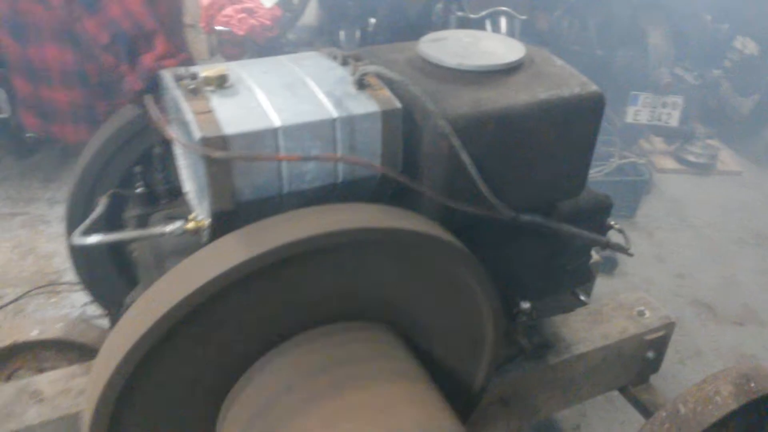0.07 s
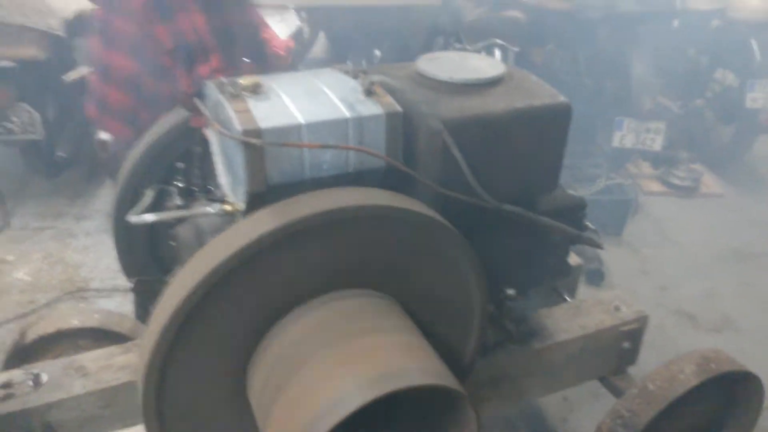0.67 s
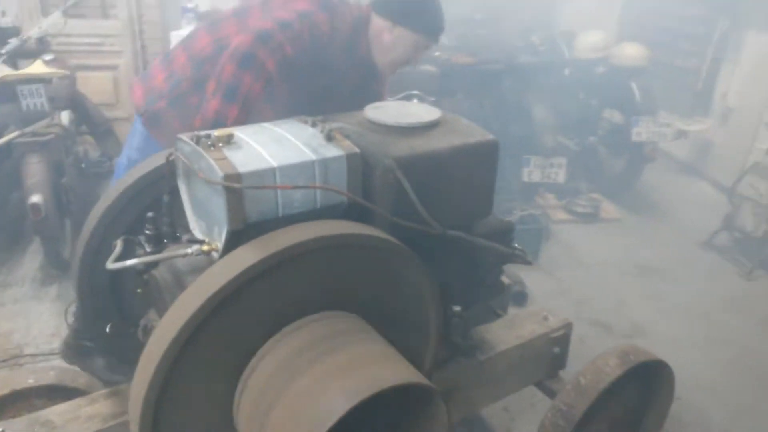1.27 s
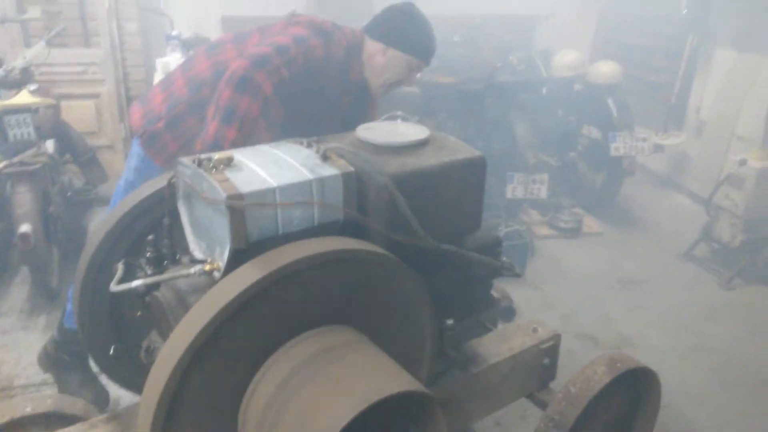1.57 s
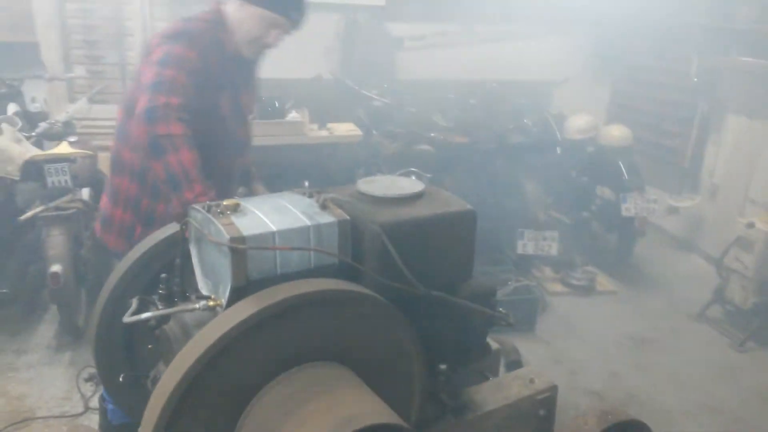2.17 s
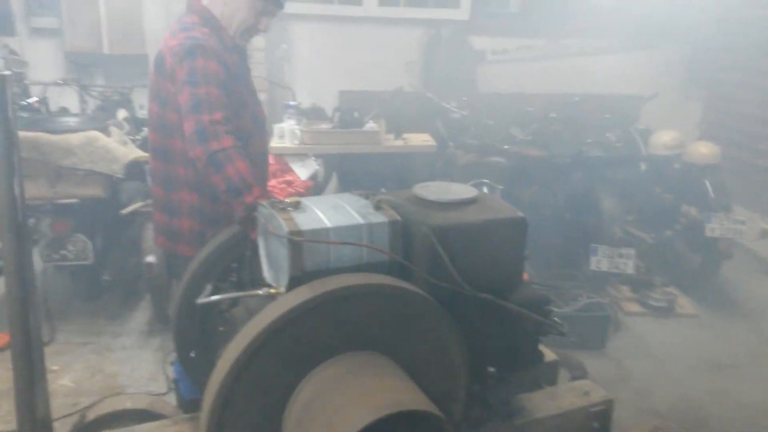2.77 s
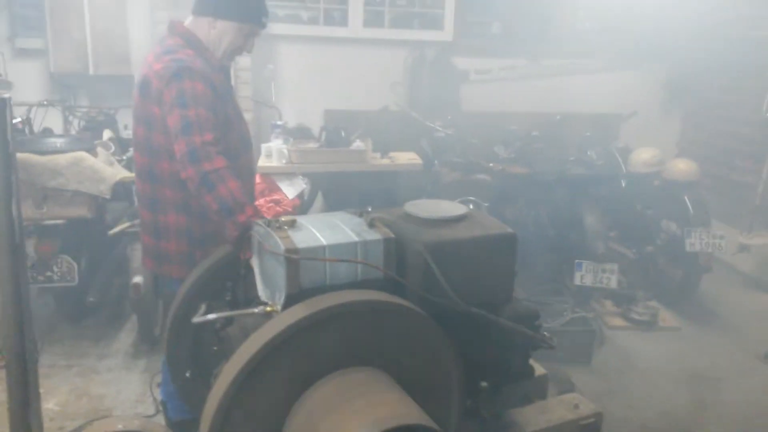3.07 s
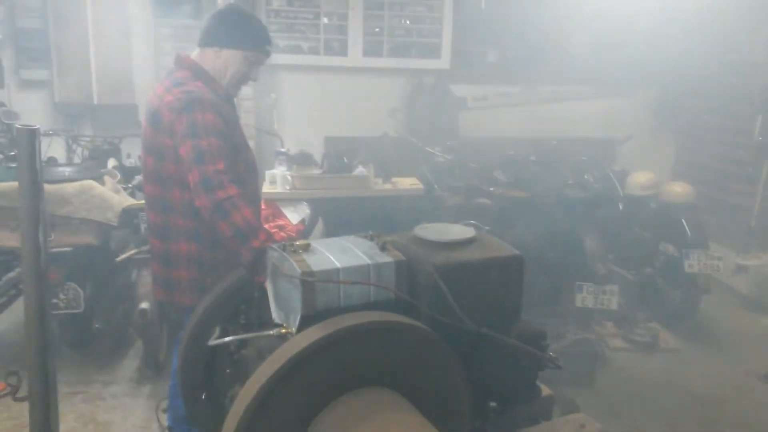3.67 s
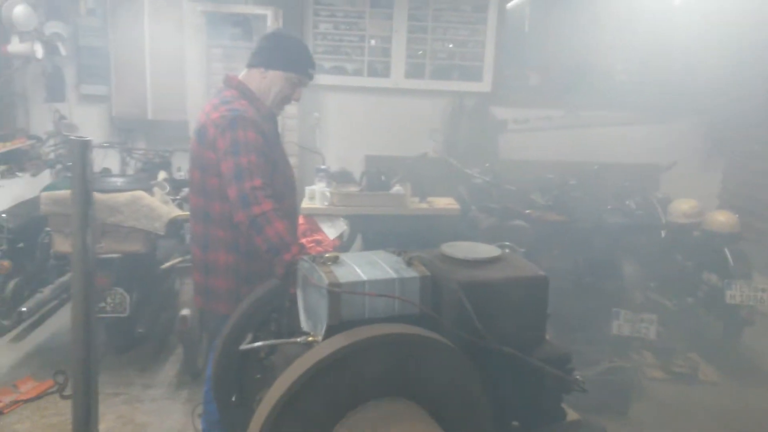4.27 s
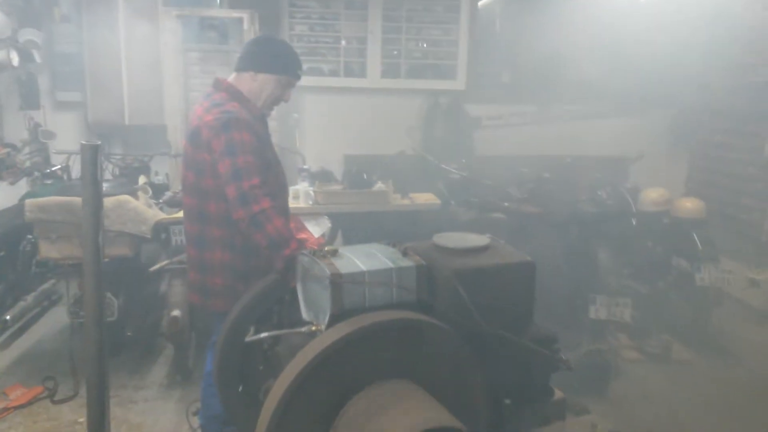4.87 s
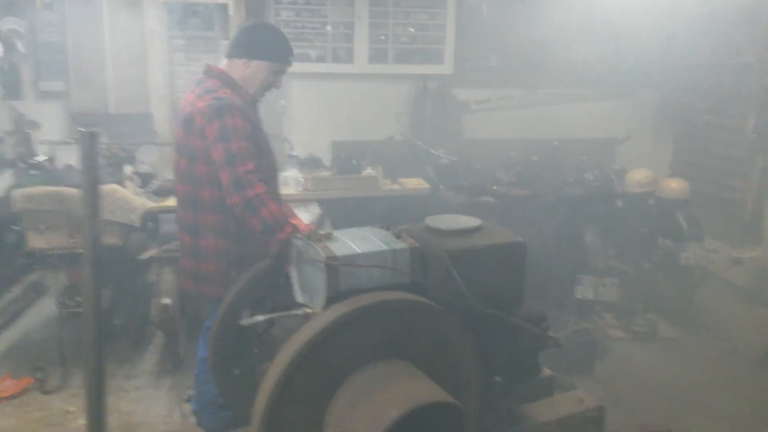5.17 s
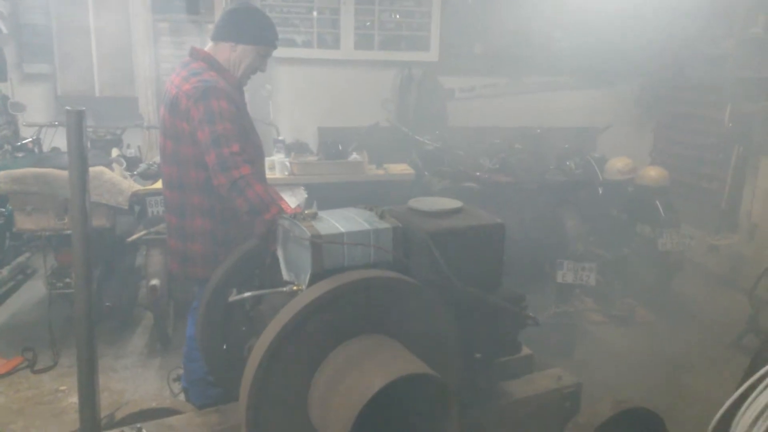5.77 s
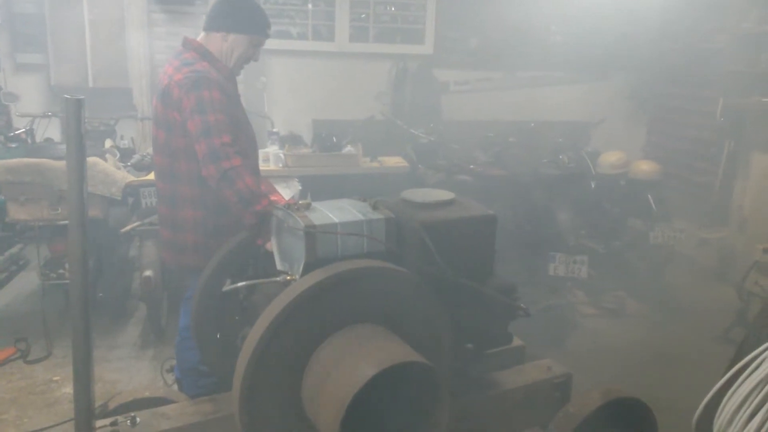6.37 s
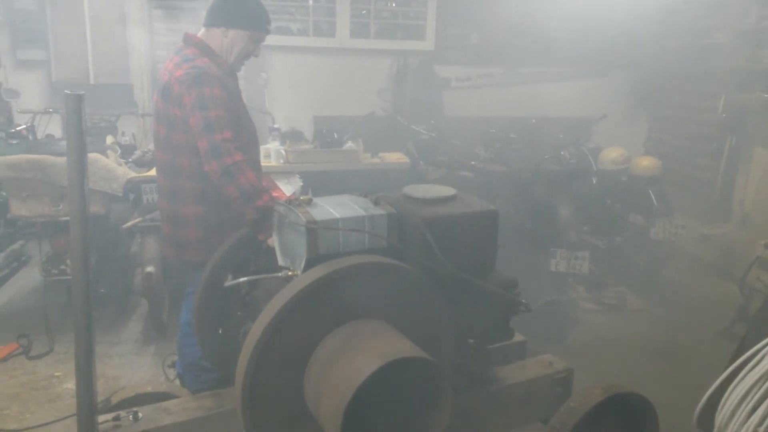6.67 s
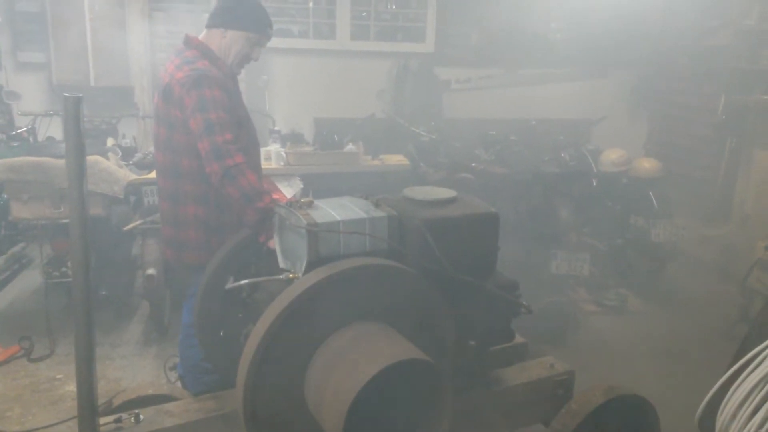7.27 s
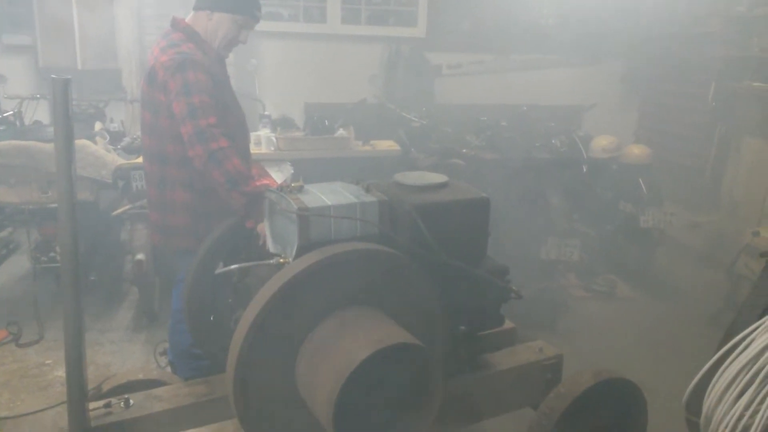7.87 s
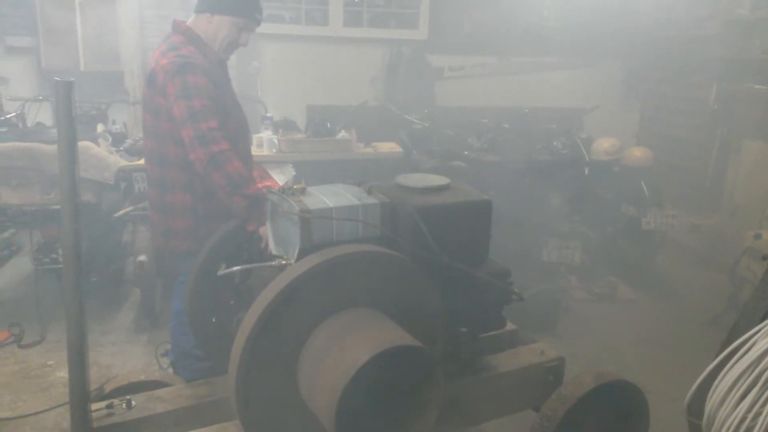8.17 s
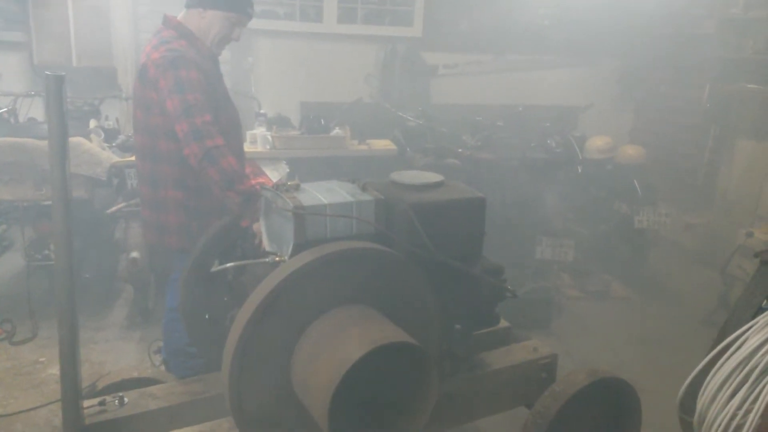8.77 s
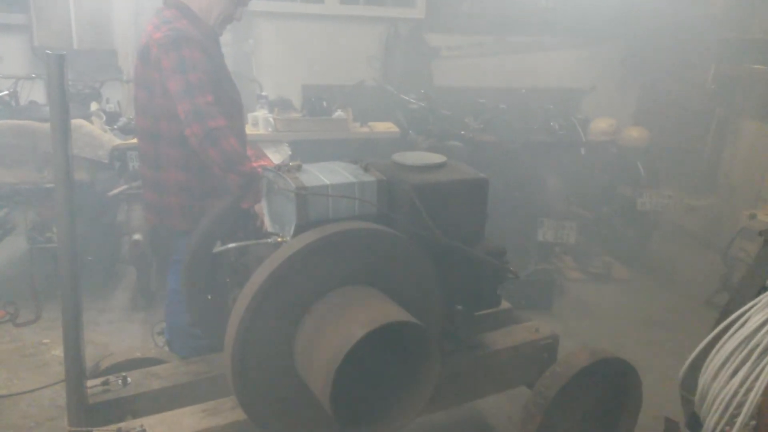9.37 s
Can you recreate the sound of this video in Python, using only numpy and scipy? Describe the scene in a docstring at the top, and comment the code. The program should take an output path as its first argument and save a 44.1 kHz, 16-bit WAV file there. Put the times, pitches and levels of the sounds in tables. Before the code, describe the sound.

Loud, rhythmic barks and hisses from an old stationary two-stroke engine that picks up speed and eases off, clattering in an echoing workshop.

```python
"""An old one-cylinder two-stroke engine fires on every other turn, catches, speeds up and slows again. On every
turn its exhaust port opens with a bark and a hiss, and the pipe, exhaust pot and water tank sound along. For
the first six seconds gas also blows off through an open cock (a small tap on the cylinder head), just ahead of
the exhaust. Behind it the moving parts clatter, air buffets the microphone with a soft rumble and the workshop
echoes. A limiter turns down the loudest blasts."""
import sys
import numpy as np
from scipy import signal
from scipy.fft import rfft, irfft
from scipy.io import wavfile
from scipy.ndimage import uniform_filter1d

SR = 44100
rng = np.random.default_rng(int(sys.argv[2]) if len(sys.argv) > 2 else 0)


def digitize_waveform(pressure):
    """Quantize a signal to 16-bit integers and store it at the path in sys.argv[1].

    Rows of a 2-D input are taken as channels; values are limited to [-1, 1].
    """
    field = np.atleast_2d(pressure).T
    bounded = np.clip(field, -1, 1)
    quanta = np.round(bounded * 32767).astype(np.int16)
    wavfile.write(sys.argv[1], SR, quanta)


N = 424241
TIME = np.arange(N) / SR


def from_db(db):
    """Turn decibels into a factor to multiply a sound by."""
    return 10 ** (np.asarray(db) / 20)


def at_hz(points, hz):
    """Read between the rows of a table, with every octave equally wide."""
    known, values = np.transpose(points)
    return np.interp(np.log(np.maximum(hz, 1)), np.log(known), values)


def convolve(x, response):
    """Every sample of x starts its own scaled copy of the response."""
    return signal.fftconvolve(np.atleast_2d(x), np.atleast_2d(response), axes=-1)[:, :N]


def coloured(x, spectrum, keep_power=True, size=4096):
    """Make some pitches louder and others softer, following a table."""
    gain = from_db(at_hz(spectrum, np.arange(size // 2 + 1) * SR / size))
    # minimum phase: the filter never sounds before it is struck
    cepstrum = irfft(np.log(gain))
    cepstrum[1:size // 2] *= 2
    cepstrum[size // 2 + 1:] = 0
    kernel = irfft(np.exp(rfft(cepstrum)))
    return convolve(x, kernel / np.linalg.norm(kernel) if keep_power else kernel)[0]


def clicks(times, levels_db, uneven_db=0):
    """A one-sample kick at each time; uneven_db varies their strength at random."""
    if uneven_db:
        levels_db = levels_db + rng.normal(0, uneven_db, len(times))
    out = np.zeros(N)
    inside = (times >= 0) & (times < (N - 1) / SR)
    out[(times[inside] * SR).astype(int)] = from_db(levels_db + np.zeros(len(times)))[inside]
    return out


def gusts(kicks, rise_s, fall_s):
    """Each kick lets out a puff of noise with the same energy as the kick."""
    age = TIME[:SR // 3]
    shape = (1 - np.exp(-age / rise_s)) * np.exp(-age / fall_s)
    return convolve(kicks, shape / np.linalg.norm(shape))[0] * rng.standard_normal(N)


def ring(kicks, pitch_hz, level_db, fade_s):
    """Each kick starts a pure tone. Here and below, fade_s is the time it takes to drop 60 dB."""
    decay = from_db(-60 / (fade_s * SR))
    angle = 2 * np.pi * pitch_hz / SR
    feedback = [1, -2 * decay * np.cos(angle), decay * decay]
    return from_db(level_db) * signal.lfilter([0, np.sin(angle)], feedback, kicks + 1e-18)


def glide(kicks, start_hz, end_hz, glide_s, level_db, peak_s):
    """Each kick starts a short note that swells, slides in pitch and dies; swirling gas makes it flutter."""
    age = TIME[:SR // 5]
    hz = end_hz + (start_hz - end_hz) * np.exp(-age / glide_s)
    swell = (age / peak_s * np.exp(1 - age / peak_s)) ** 2
    tone = convolve(kicks, from_db(level_db) * swell * np.exp(2j * np.pi * np.cumsum(hz) / SR))[0]
    slow = signal.butter(2, end_hz / 8, fs=SR, output="sos")
    swirls = signal.sosfilt(slow, rng.standard_normal((2, N)))
    flutter_depth = .35 * min(end_hz / 700, 1)   # low notes flutter less
    swirls *= flutter_depth / swirls.std()
    return tone.imag * (1 + swirls[0]) + tone.real * swirls[1]


# How fast the flywheel spins: time_s, turns_per_s
FLYWHEEL_SPEED = [(0.0, 5.17), (0.26, 5.231), (1.7, 5.207), (2.96, 5.818), (3.32, 5.601), (4.11, 5.771),
                  (5.84, 6.524), (6.34, 6.485), (8.32, 5.837), (9.6, 5.396)]
def crank_times(share, first_port_share=.2605):
    """The times at which the crank is a given share of a turn past the opening of the exhaust port."""
    times = np.linspace(0, N / SR, 10000)
    turns = np.cumsum(np.interp(times, *np.transpose(FLYWHEEL_SPEED))) * times[1] - first_port_share
    return np.interp(np.arange(np.ceil(turns[-1])) + share, turns, times)


# When the cock is open, wide for long blasts or barely for spits: start_s, end_s, level_db, length_s
COCK_OPEN = [(0, .5, -.5, 0.041), (.6, 1.6, -2.5, 0.017), (1.65, 2.9, -3, .045), (2.95, 3.1, -6, 0.0043),
             (3.45, 3.95, -5.5, 0.0078), (4, 4.65, -3, .05), (4.7, 6.1, -2.2, 0.045)]
def firings(lead_share=.246, catches_s=1.6):
    """Each turn's firing time, blast level and blast length (0 if the cock is shut or it does not fire)."""
    times, port_times = crank_times(-lead_share), crank_times(0)
    fires = (times > catches_s) | (np.arange(len(times)) % 2 == 0)
    blast_db, blast_s = np.zeros((2, len(times)))
    for start_s, end_s, level_db, length_s in COCK_OPEN:
        vents = fires & (port_times > start_s) & (times < end_s)
        blast_db[vents], blast_s[vents] = level_db, length_s
    return times, blast_db, blast_s


def blasts():
    """Times, levels and lengths of just those firings that blow off through the cock."""
    times, blast_db, blast_s = firings()
    vents = blast_s > 0
    return times[vents], blast_db[vents], blast_s[vents]


# How hard the exhaust pushes: time_s, level_db
EFFORT = [(0, 2.5), (1.5, 2.5), (2.2, 2.5), (4.5, 1.5), (5.4, 4.5), (6.3, 2.5), (9.6, 2)]
def strokes(loss_db=2, full_blast_s=0.062):
    """Time and level of each exhaust stroke; a blast just before it bleeds off up to loss_db."""
    times = crank_times(0)
    _, _, blast_s = firings()
    bled_db = loss_db * np.sqrt(np.clip(blast_s / full_blast_s, 0, 1))
    return times, np.interp(times, *np.transpose(EFFORT)) - bled_db


# How long the workshop echoes: pitch_hz, fade_s
ROOM_FADE = [(60, 0.061), (200, 0.63), (1000, 0.6), (3000, 0.42), (7000, 0.38), (13000, 0.22)]
# How alike the echoes are at the two ears: pitch_hz, likeness (0 or less unrelated, near 1 the same)
EAR_LIKENESS = [(130, 1.13), (300, 0.81), (630, 0.77), (1300, -0.23), (3000, -0.02)]
def echoes(near_db, near_s, size=32768, bands=9):
    """The echoes at one spot: a quick cluster off the engine itself, then a dense tail from the room."""
    hz, age = np.arange(size // 2 + 1) * SR / size, TIME[:size]
    centres = np.geomspace(60, 14000, bands)
    noise = rfft(rng.standard_normal((2, size)))
    tail = 0
    for centre, weights in zip(centres, np.eye(bands)):
        band = irfft(noise * at_hz(list(zip(centres, weights)), hz))
        tail = tail + band * from_db(-60 * age / at_hz(ROOM_FADE, centre))
    spectrum = rfft(tail * (1 + from_db(near_db) * np.exp(-age / near_s)))
    # even out the overall tone, but keep the fine peaks and dips
    broad_power = uniform_filter1d(uniform_filter1d(abs(spectrum) ** 2, size=90), size=60)
    mid, side = spectrum / np.sqrt(broad_power)
    alike = np.clip(at_hz(EAR_LIKENESS, hz), 0, .99)
    ears = np.sqrt((1 + alike) / 2) * mid + np.sqrt((1 - alike) / 2) * side * [[1], [-1]]
    return irfft(ears)[:, :size * 3 // 4]


# The listener steps back, ever more slowly: time_s, share_of_way
LISTENER_WALK = [(0, 0), (3, .5), (6, .75), (9.7, .95)]
def workshop(x, near_db, near_s, spots):
    """As the listener moves, the echoes of one spot blend into those of the next."""
    place = (spots - 1) * np.interp(TIME, *np.transpose(LISTENER_WALK))
    out = np.zeros((2, 2 * N))
    for spot in range(spots):
        nearby = np.flatnonzero(abs(place - spot) < 1)
        blend = np.cos((place[nearby] - spot) * np.pi / 2)
        heard = convolve(x[nearby] * blend, echoes(near_db, near_s))
        out[:, nearby[0]:nearby[0] + heard.shape[1]] += heard
    return out[:, :N]


def mic_rumble(level_db=-42.5, band_hz=(65, 220)):
    """Air buffets the microphone openings with a soft low rumble, different at each ear."""
    band = signal.butter(2, band_hz, "band", fs=SR, output="sos")
    air = signal.sosfilt(band, rng.standard_normal((2, N)))
    return from_db(level_db) * air / air.std()


# Knocks of the moving parts after the port opens: share_of_turn, level_db
KNOCKS = [(.27, -9.5), (.47, 4), (.62, -1.5), (.78, 0.5)]
# The tone of their clatter: pitch_hz, level_db
CLATTER_TONE = [(50, -33), (80, -29), (150, 3.5), (260, -3), (380, 0.5), (650, -4.5), (950, -4), (1700, -1),
                (2600, -13.5), (4500, -16), (7000, -6.5), (10000, -25.5), (15000, -74)]
def moving_parts(knock_db=7.0, rattle_db=3.0, rub_db=-29.0):
    """Rod, pump and intake flap knock at set points of each turn, over the steady rub of the bearings."""
    kicks = sum(clicks(crank_times(share), level_db, uneven_db=2.5) for share, level_db in KNOCKS)
    rattle = from_db(rattle_db) * gusts(kicks, rise_s=0.00077, fall_s=0.0091)
    rub = from_db(rub_db) * rng.standard_normal(N)
    return coloured(from_db(knock_db) * kicks + rattle + rub, CLATTER_TONE)


# The note of the rod: pitch_hz, level_db, fade_s
ROD_NOTE = [(1178, -20, 0.079)]
def rod_ring():
    """The rod rings briefly each time it knocks."""
    return ring(clicks(crank_times(share=.47), 0, uneven_db=2), *ROD_NOTE[0])


# The low note of the firing stroke: start_hz, end_hz, glide_s, level_db, peak_s
THUD_NOTE = [(87, 72, .02, -30.5, 0.013)]
def firing_thud():
    """A soft thud on every turn, as the crank passes the firing point."""
    return glide(clicks(crank_times(share=.77), 0), *THUD_NOTE[0])


# The note of the water tank: pitch_hz, level_db, fade_s
TANK_NOTE = [(197, -17, 1.25)]
# How strongly the tank booms and the exhaust pot hoots: time_s, tank_db, hoot_db
BOOM_AND_HOOT = [(0, -13, -1), (.4, -0.5, 2), (.8, 1, 2), (1.5, 2, 2), (1.9, -37, 8.5), (3, -18, 4),
                 (4.2, -21, 4), (5, -29, -0.5), (9.6, -24, 1.5)]
def tank_boom(delay_s=.06, swell_s=0.0045, hold_s=0.19, choke_s=.012):
    """After each blast the water tank booms for about one turn and is then choked."""
    pitch_hz, level_db, fade_s = TANK_NOTE[0]
    time_s, tank_db, _ = np.transpose(BOOM_AND_HOOT)
    times, _, _ = blasts()
    kicks = clicks(times + delay_s, np.interp(times, time_s, tank_db))
    age = TIME[:SR // 3]
    shape = (1 - np.exp(-age / swell_s)) * from_db(level_db - 60 * age / fade_s)
    choke = np.exp(-np.maximum(age - hold_s, 0) / choke_s)
    return convolve(kicks, shape * choke * np.sin(2 * np.pi * pitch_hz * age))[0]


# The rising note of the exhaust pot: start_hz, end_hz, glide_s, level_db, peak_s
HOOT_NOTE = [(304, 369.5, 0.044, -21, 0.016)]
def pot_hoot():
    """Each stroke blows a hollow hoot from the exhaust pot, the chamber that the gas leaves through."""
    times, stroke_db = strokes()
    time_s, _, hoot_db = np.transpose(BOOM_AND_HOOT)
    return glide(clicks(times, stroke_db + np.interp(times, time_s, hoot_db)), *HOOT_NOTE[0])


# The ringing notes of the exhaust pot and the room: pitch_hz, level_db, fade_s, delay_s
POT_RINGS = [(159.5, -31, 0.41, 0.0287), (198.7, -25, 0.41, .057), (332, -28.5, 1, 0.00796),
             (352.3, -30, 0.94, .04), (444, -24.5, 0.31, 0.01005), (793, -24, 0.66, .02),
             (892.3, -18, 0.18, .015), (906.7, -26, 0.89, .025), (1158, -16.5, 0.25, 0.00103),
             (1369, -18, 0.085, 0.01), (1724, -28, 0.39, .012), (2027, -22.5, 0.075, 0.017)]
# How much louder or softer the upper notes ring: time_s, level_db
UPPER_RING_LEVEL = [(0, -1.5), (4.6, -2.5), (5.4, 0), (9.6, 2)]
def pot_rings(upper_above_hz=600):
    """Each stroke sets the pot and the room ringing, every note after its own short delay."""
    times, stroke_db = strokes()
    upper_db = np.interp(times, *np.transpose(UPPER_RING_LEVEL))
    out = 0
    for pitch_hz, level_db, fade_s, delay_s in POT_RINGS:
        kicks = clicks(times + delay_s, stroke_db + upper_db * (pitch_hz > upper_above_hz), uneven_db=2)
        out = out + ring(kicks, pitch_hz, level_db, fade_s)
    return out


# The notes of the exhaust pipe: start_hz, end_hz, glide_s, level_db, peak_s
PIPE_NOTES = [(102, 87, 0.026, -30.5, 0.022), (167.2, 124, 0.03, -24, 0.022),
              (1334.4, 740, 0.01574, -17.5, 0.012), (998, 1950, 0.01488, -18.5, 0.01),
              (211, 544.4, 0.03024, -23.5, 0.017)]
def pipe_notes(lead_s=0.004997):
    """On each stroke the pipe sounds short notes that slide as the gas pressure falls."""
    times, stroke_db = strokes(loss_db=7)
    return sum(glide(clicks(times - lead_s, stroke_db, uneven_db=2), *note) for note in PIPE_NOTES)


# The tone of the hiss at the port: pitch_hz, level_db
HISS_TONE = [(300, -25.5), (1500, -7.5), (3500, -21.5), (5200, -2), (6600, 3), (7500, 0), (9000, -10),
             (11000, -15), (15000, -46)]
def port_hiss(jet_db=18.5, jet_lead_s=.002, leak_db=8.5, leak_lead_s=0.0156):
    """Gas cracks and hisses through the first narrow slit of the port, with a fainter leak just before."""
    times, stroke_db = strokes(loss_db=1.5)
    kicks = clicks(times - jet_lead_s, stroke_db + jet_db)
    jet = gusts(kicks, rise_s=0.00036, fall_s=0.0061)
    leak = gusts(clicks(times - leak_lead_s, stroke_db + leak_db), rise_s=0.00035, fall_s=0.0027)
    return coloured(.5 * kicks + jet + leak, HISS_TONE)


# The tone of the jet from the cock: pitch_hz, level_db
BLOW_OFF_TONE = [(40, -7.5), (75, -6), (150, -4), (400, -4.5), (1100, -10), (1950, -2.5), (2600, -8),
                 (3400, -5.5), (4200, -9), (5600, -5.5), (6900, 4.5), (7700, 1), (9200, -8), (14500, -18)]
def blow_off(jet_db=-4.5, burst_db=29.5, close_s=0.0078, sag_db_per_s=-68.0):
    """Squeezed gas bursts out of the cock; the jet weakens and stops as the pressure falls."""
    times, levels_db, lengths_s = blasts()
    flow = np.zeros(N)
    for start_s, level_db, length_s in zip(times, levels_db, lengths_s):
        start = max(int(start_s * SR), 0)
        age = TIME[:min(SR // 5, N - start)]
        closing = np.exp(-np.maximum(age - length_s, 0) / close_s)
        flow[start:start + len(age)] += from_db(level_db + sag_db_per_s * age) * closing
    burst = gusts(clicks(times, levels_db + burst_db), rise_s=0.00041, fall_s=0.0044)
    jet = from_db(jet_db) * flow * rng.standard_normal(N)
    return coloured(jet + burst, BLOW_OFF_TONE)


# The tone of the exhaust's bark: pitch_hz, level_db
BARK_TONE = [(60, -21.5), (120, -25.5), (170, -1), (255, -10), (340, 1.5), (480, -4), (680, -4.5), (900, 2),
             (1150, 0.5), (1330, -7), (1700, -4), (2500, -12.5), (5000, -13), (12000, -55.5)]
def exhaust_bark(pop_db=19.0, rush_db=11.0):
    """The port opens: one sharp pop of pressure, and a rush of gas behind it."""
    kicks = clicks(*strokes())
    rush = gusts(kicks, rise_s=0.0011, fall_s=0.035)
    return coloured(from_db(pop_db) * kicks + from_db(rush_db) * rush, BARK_TONE)


def scene(notes_to_room_db=-10.0):
    """The engine is close; its exhaust leaves from the far side and arrives mostly as echoes."""
    notes = pipe_notes() + pot_hoot() + firing_thud()
    ring_band = signal.butter(2, [130, 4000], "band", fs=SR, output="sos")
    notes += signal.sosfilt(ring_band, pot_rings() + tank_boom() + rod_ring())
    far_side = workshop(exhaust_bark() + from_db(notes_to_room_db) * notes,
                        near_db=-39.0, near_s=0.014, spots=5)
    # the echoes of high sounds change sooner along the walk, so these get more spots
    near_side = workshop(port_hiss() + blow_off() + moving_parts(), near_db=-0.5, near_s=0.01, spots=10)
    direct_notes = notes * from_db([[-.3], [.3]])   # slightly to the right
    return mic_rumble() + direct_notes + near_side + far_side


def limiter(x, ceiling_db=-5.0, release_db_per_s=54.0, sense_s=0.018):
    """The volume drops at once on loud blasts and creeps back."""
    memory = np.exp(-1 / (sense_s * SR))
    power = signal.lfilter([1 - memory], [1, -memory], np.mean(x ** 2, axis=0))
    over_db = np.maximum(10 * np.log10(power + 1e-12) - ceiling_db, 0)
    recovery_db = release_db_per_s * TIME
    return x * from_db(recovery_db - np.maximum.accumulate(over_db + recovery_db))


# How the two microphone openings differ in tone: pitch_hz, left_minus_right_db
MIC_BALANCE = [(100, 0), (1000, 0.5), (2000, -1.5), (3200, 3), (5000, 6.5), (6400, 5.5), (7100, 8.5),
               (7900, -1), (10000, -0.5), (13000, -1)]
def record(dry, round_off_at=0.76, low_cut_hz=36, high_cut_hz=14950):
    """The microphone tints each side, limits blasts, rounds peaks and cuts the deepest and highest sound."""
    ears = [coloured(ear, [(hz, sign * db / 2) for hz, db in MIC_BALANCE], keep_power=False)
            for ear, sign in zip(dry, (1, -1))]
    held = limiter(np.array(ears))
    rounded = held / (1 + (held / round_off_at) ** 4) ** (1 / 4)
    low_cut = signal.butter(2, low_cut_hz, "high", fs=SR, output="sos")
    high_cut = signal.ellip(12, .1, 70, high_cut_hz, fs=SR, output="sos")
    return signal.sosfilt(high_cut, signal.sosfilt(low_cut, rounded))


dry = scene()
out = record(dry)
digitize_waveform(out)
```